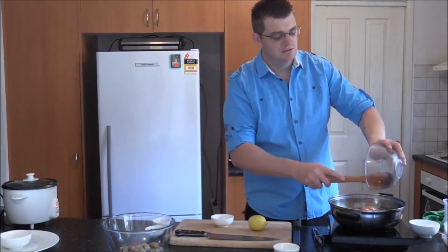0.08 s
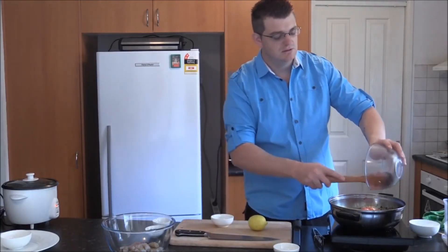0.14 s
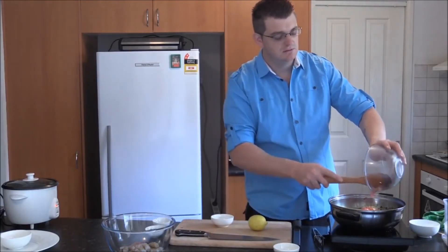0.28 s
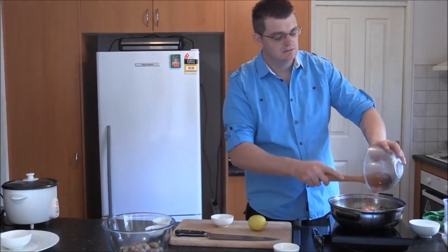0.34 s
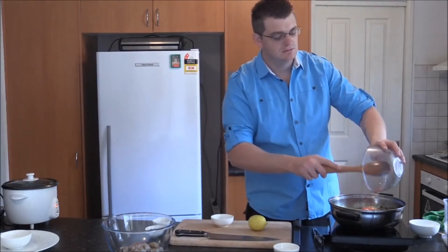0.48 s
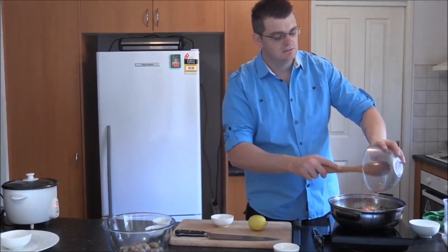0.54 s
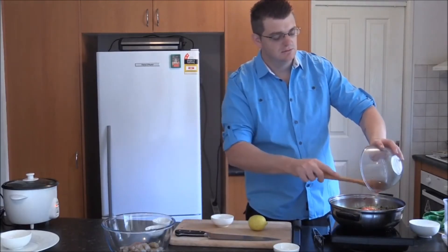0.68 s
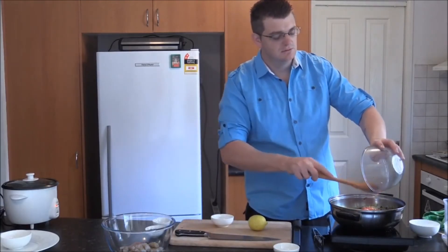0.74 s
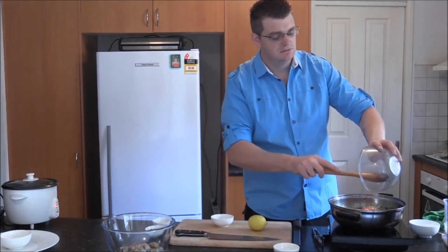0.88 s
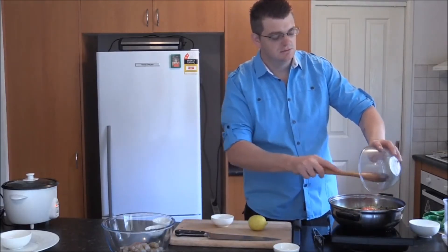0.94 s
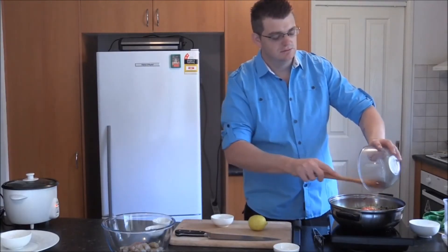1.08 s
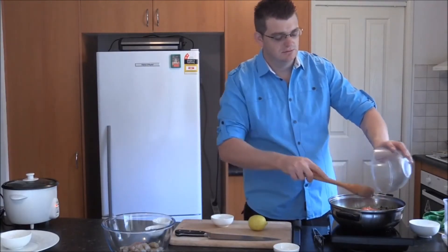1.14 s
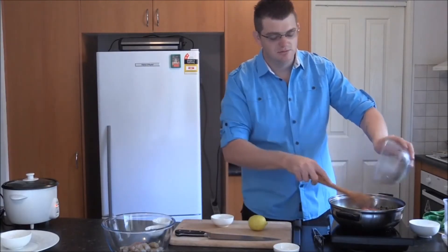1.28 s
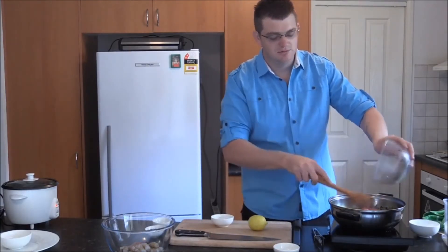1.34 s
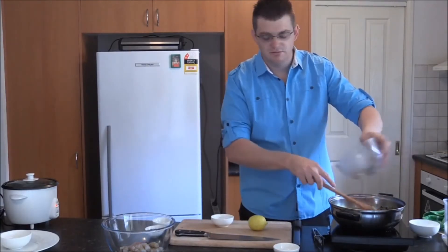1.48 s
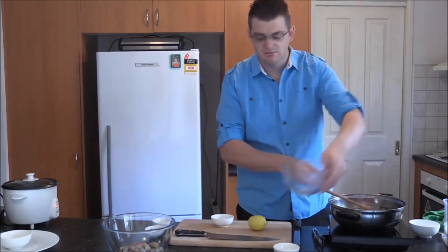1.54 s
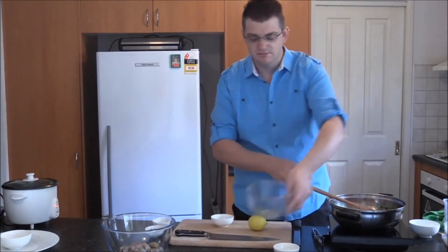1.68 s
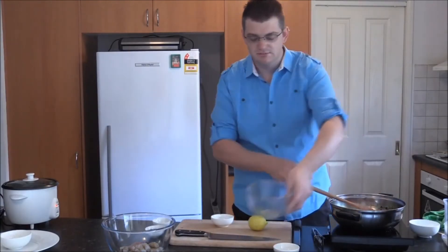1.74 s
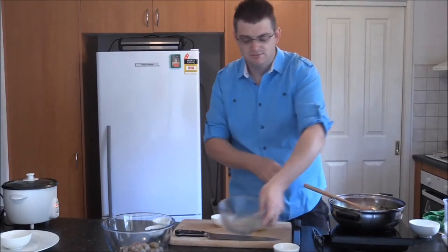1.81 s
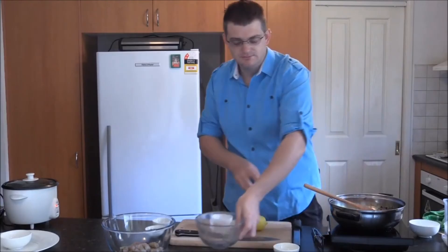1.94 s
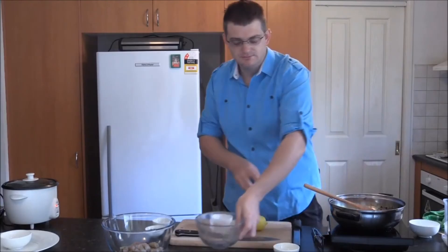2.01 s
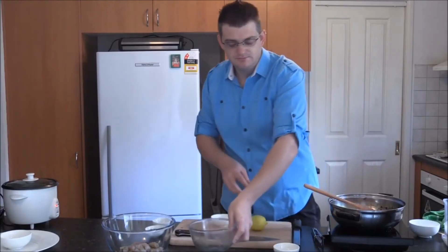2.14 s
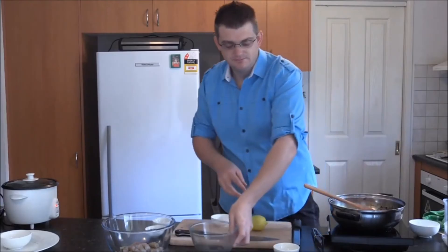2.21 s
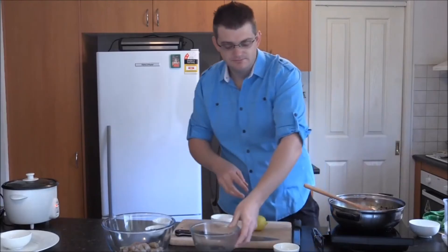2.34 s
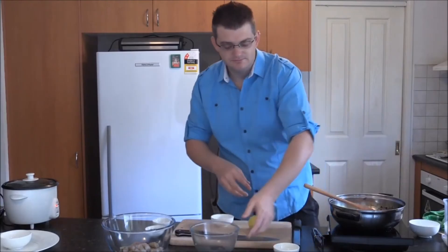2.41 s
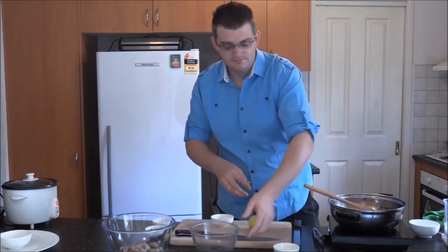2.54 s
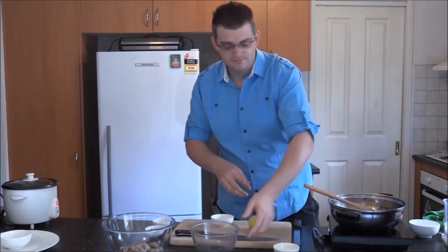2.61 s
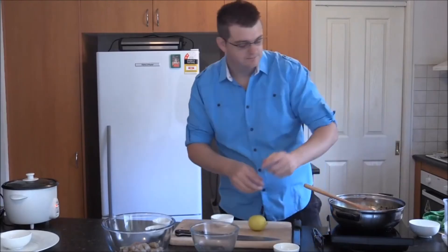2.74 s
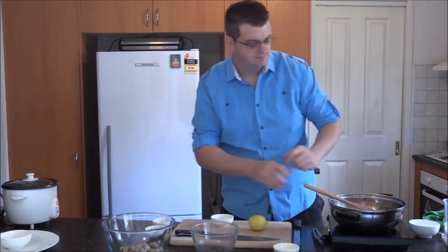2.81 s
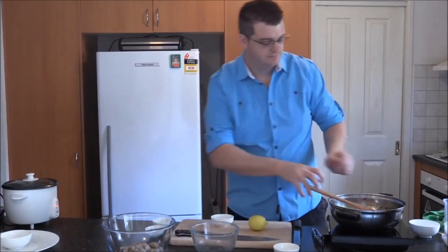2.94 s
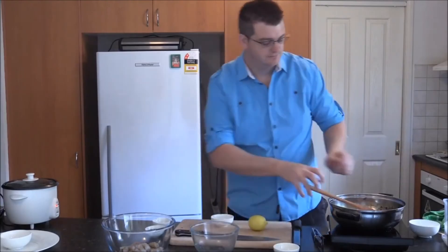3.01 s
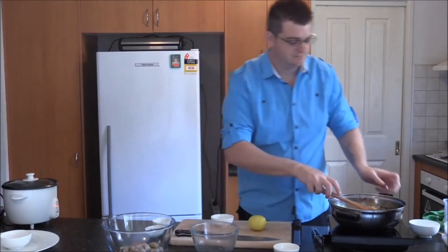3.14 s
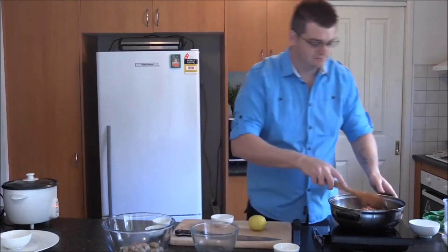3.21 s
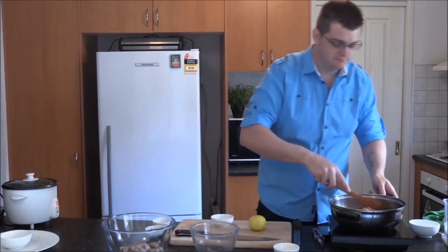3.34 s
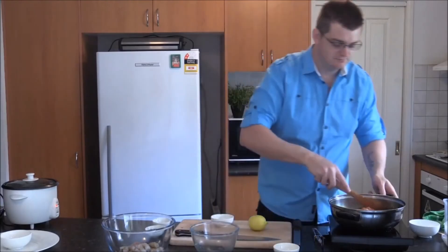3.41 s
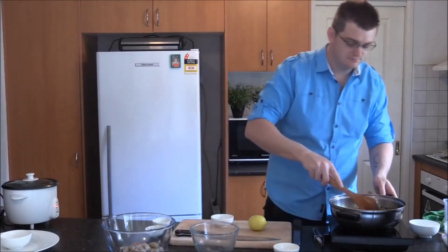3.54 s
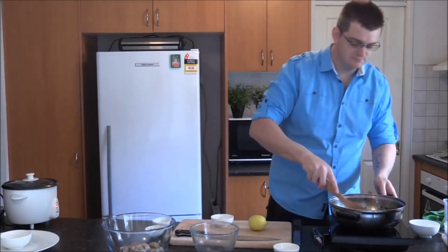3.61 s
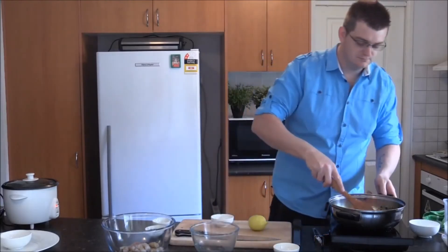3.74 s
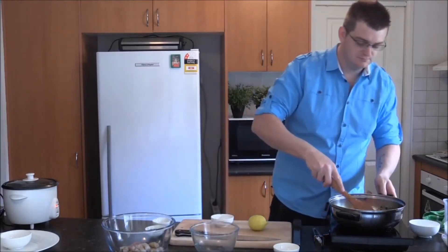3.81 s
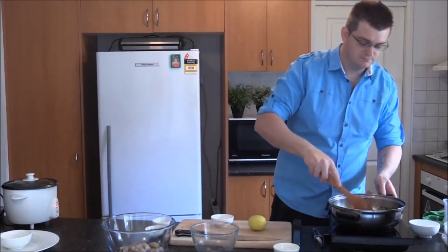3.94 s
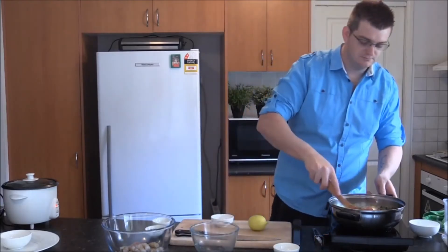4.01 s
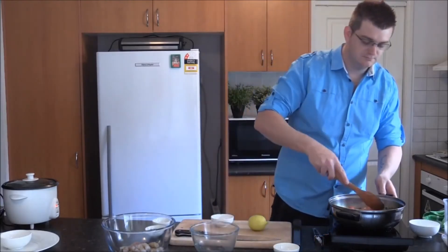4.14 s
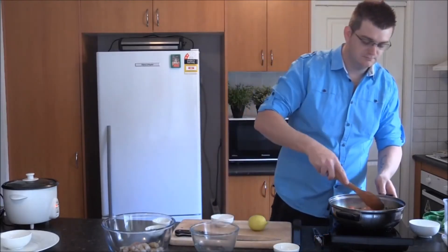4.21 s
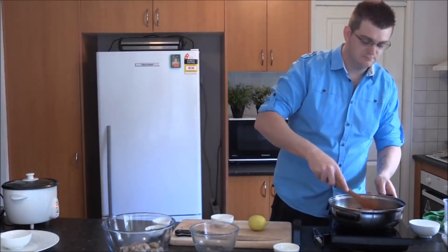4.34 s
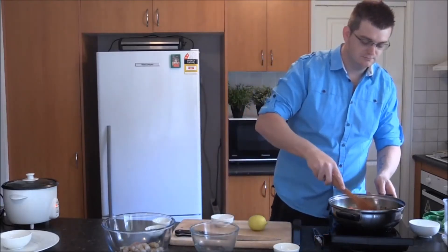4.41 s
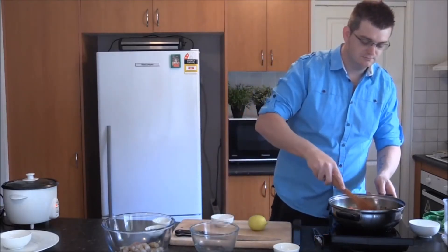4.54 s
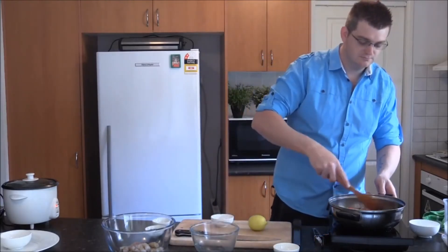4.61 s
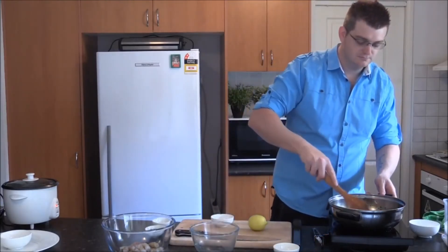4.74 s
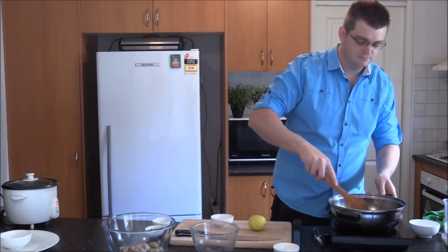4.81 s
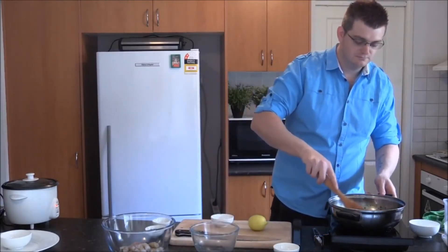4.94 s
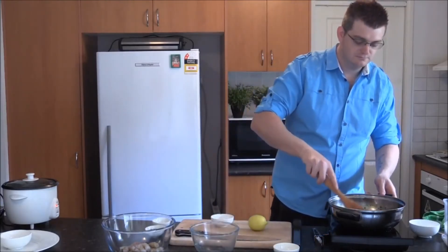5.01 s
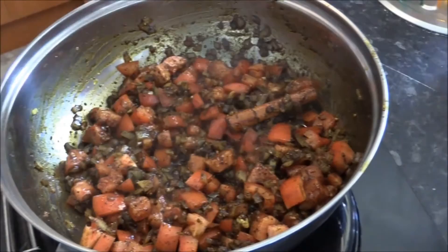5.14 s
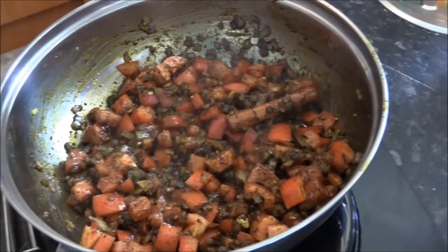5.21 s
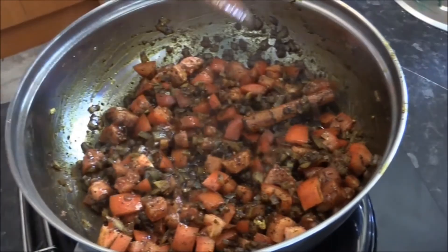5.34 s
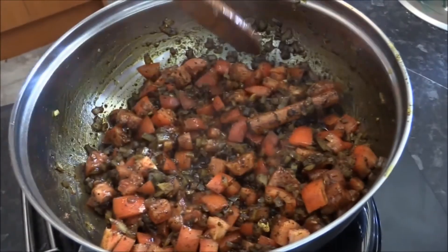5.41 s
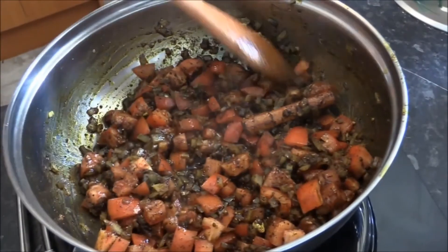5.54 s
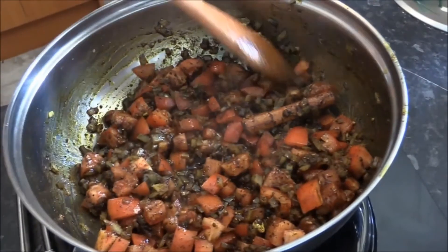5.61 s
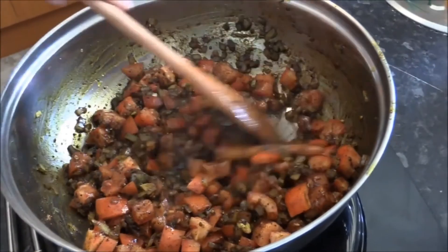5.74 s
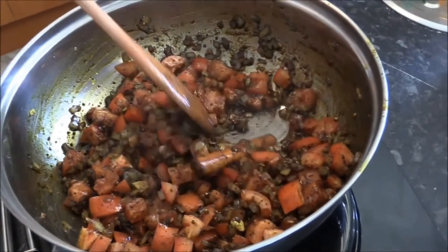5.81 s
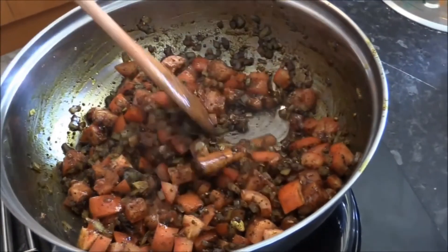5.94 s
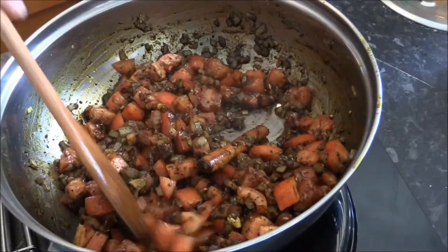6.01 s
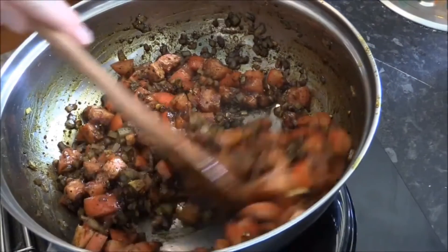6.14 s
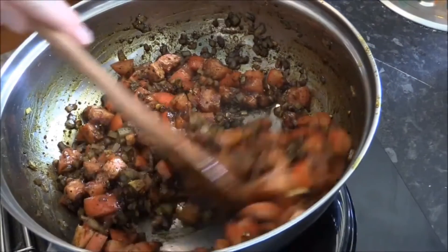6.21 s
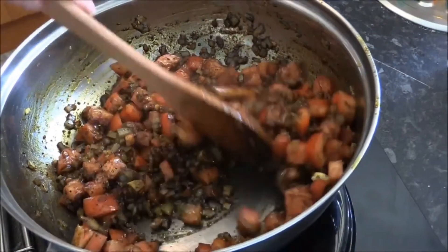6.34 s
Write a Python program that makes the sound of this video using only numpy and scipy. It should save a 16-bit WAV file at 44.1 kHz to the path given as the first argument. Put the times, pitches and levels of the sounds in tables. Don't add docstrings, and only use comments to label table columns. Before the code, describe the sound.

Distant frying and a breathy fan hum fill a lightly reverberant kitchen. Sharp, short knocks of wood on a plastic bowl come first, loud enough to duck the background. A dull set-down and a fast wobbling rattle on the counter follow, then steam hiss rising as the pan is stirred. The view cuts close, with dense crackling, fuller fan drone, soft low thuds on the loaded pan and a strong knock at the end.

```python
import sys
import numpy as np
from scipy import signal
from scipy.io import wavfile
from scipy.ndimage import uniform_filter1d, minimum_filter1d

SR = 44100
rng = np.random.default_rng(int(sys.argv[2]) if len(sys.argv) > 2 else 0)


def magnitude_from_level(level_db):
    exponent = np.asarray(level_db, float) / 20
    return 10 ** exponent


def master_out(mix):
    frames = np.transpose(np.atleast_2d(mix))
    ceiling = np.clip(frames, -1, 1)
    pcm = np.round(ceiling * 32767).astype(np.int16)
    wavfile.write(sys.argv[1], SR, pcm)


N = 280917
SCENE_CHANGE_S = 5.316
SPLIT = np.array([[.5], [-.5]])


def evened(x):
    return x / np.sqrt(np.mean(x ** 2) + 1e-20)


def read(points, hz):
    f, value = np.transpose(points)
    return np.interp(np.log(hz + 1), np.log(f + 1), value)


def resonate(x, hz, width):
    b, a = signal.iirpeak(hz, hz / width, SR)
    return signal.lfilter(b, a, x)


def resonate_twice(x, hz, width):
    return resonate(resonate(x, hz, width), hz, width)


def soften(x, hz, order=2):
    return signal.sosfilt(signal.butter(order, np.clip(hz, 50, 18000), fs=SR, output="sos"), x)


def thin(x, hz):
    return signal.sosfilt(signal.butter(4, hz, "high", fs=SR, output="sos"), x)


def by_view(far, close):
    return np.where(np.arange(N) < SCENE_CHANGE_S * SR, far, close)


def hump(s, half_s):
    return np.cos(np.pi / 2 * np.clip((np.arange(N) / SR - s) / half_s, -1, 1)) ** 2


def stirred():
    # start t/s, length t/s, share of the pan
    strokes = [
        (3.58, 0.19, 0.49),
        (4.34, 0.56, 0.43),
    ]
    t = np.arange(N) / SR
    return sum(share * np.clip((t - s) / length, 0, 1) for s, length, share in strokes)


def air(colour, patchy_db, pops=0):
    # f/Hz, left-right likeness
    coherence = [(60, 0.19), (180, 1), (550, 0.8), (1650, 0.46), (4970, 0.66), (15000, 0.51)]
    # f/Hz, left over right level/dB
    balance = [(60, -14), (180, 4), (550, 4), (1650, 2.5), (4970, 1), (15000, 1.5)]
    hz, _, z = signal.stft(rng.standard_normal((2, N)) + pops, SR, nperseg=512, noverlap=384)
    same = np.clip(read(coherence, hz), 0, 1)[:, None]
    z[1] = same * z[0] + np.sqrt(1 - same ** 2) * z[1]
    patches = uniform_filter1d(rng.standard_normal(z[0].shape), size=9, axis=0)
    patches = evened(uniform_filter1d(patches, size=9, axis=1))
    lean_db = read(balance, hz)[:, None] * SPLIT[:, :, None]
    z = z * magnitude_from_level(read(colour, hz)[:, None] + lean_db + patchy_db * patches)
    return evened(signal.istft(z, SR, nperseg=512, noverlap=384)[1][:, :N])


def ring(modes, pitch, hard_db, crack_db, crack_hz, count=120):
    t = np.arange(SR // 3) / SR
    sides = rng.choice([-1, 1], len(modes))
    tone = 0
    for side, (hz, db, t60) in zip(sides, modes):
        level = magnitude_from_level(db + hard_db * np.log2(hz / 1700) - 60 * t / t60)
        tone = tone + side * level * np.sin(2 * np.pi * hz * pitch * t)
    contact = np.zeros(len(t))
    contact[[10, count]] = .4, 1
    crack = soften(contact, crack_hz, order=3)
    both = tone * np.minimum(1, t / 0.00087) + magnitude_from_level(crack_db) * crack / abs(crack).max()
    return both / np.sqrt(np.mean(both[:200] ** 2)) * 0.22


def add(mix, s, sound):
    part = mix[..., round(s * SR):][..., :sound.shape[-1]]
    part += sound[..., :part.shape[-1]]


def kitchen(x, wet_db):
    # f/Hz, t60 t/s
    room_decay = [(250, 0.35), (700, 0.35), (1700, 0.38), (4600, 0.33), (10000, 0.26)]
    taps = np.zeros((2, SR // 2))
    slots = np.arange(120, SR // 2 - 20, 20)
    at = slots + rng.integers(0, 20, (2, len(slots)))
    np.put_along_axis(taps, at, rng.choice([-1., 1.], at.shape), 1)
    taps[1] = 0.72 * taps[0] + 0.9 * taps[1]
    hz, t, z = signal.stft(taps, SR, nperseg=256)
    tail = signal.istft(z * magnitude_from_level(-60 * t / read(room_decay, hz)[:, None]), SR, nperseg=256)[1]
    tail = tail / np.linalg.norm(tail[0])
    return x + magnitude_from_level(wet_db) * signal.fftconvolve(x, tail, axes=1)[:, :x.shape[1]]


def fan():
    # f/Hz, level/dB per Hz
    rush = [(40, -58), (120, -46), (200, -13.5), (300, 0), (420, -6), (600, -5.5), (1000, -5.5), (1500, -8),
            (3000, -15), (6000, -20), (12000, -42)]
    # f/Hz, width f/Hz, level/dB
    housing = [(348.5, 41.5, -9), (476, 10.6, -12), (683, 34, -16.5), (1074.4, 22, -11.5),
               (1838, 37, -17.5), (2140, 28, -50)]
    flow = rng.standard_normal(N)
    whines = sum(magnitude_from_level(db) * evened(resonate_twice(flow, hz, width)) for hz, width, db in housing)
    waver = evened(soften(rng.standard_normal(N), 3.0))
    blade_hz, blade_db = 1088 + 1.4 * waver, -9 + 2.1 * waver
    blade = magnitude_from_level(blade_db) * np.sin(2 * np.pi * np.cumsum(blade_hz) / SR)
    tones = (whines + blade) * magnitude_from_level(3.2 * SPLIT)
    level_db = by_view(-46, -27.5) + by_view(0.3, 1.2) * SPLIT
    return magnitude_from_level(level_db) * (thin(air(rush, patchy_db=1.14), 175) + tones)


def frying():
    # f/Hz, level/dB per Hz
    bubbling = [(500, -52), (1000, -3.5), (2000, 1.5), (3300, -2), (5000, -10), (8000, -22), (15000, -67)]
    # f/Hz, level/dB per Hz
    steam = [(1500, -48), (3000, 1.5), (5000, 0.5), (8000, -2.5), (11000, -9.5), (14000, -14), (16000, 2.5)]
    # t/s, vigour level/dB
    vigour = [(0.0, -0.5), (0.3, 2.5), (0.6, 5), (1.0, 4.5), (1.77, 2.5), (2.2, 4.5), (2.5, 3), (2.8, 2.5),
              (3.57, 2), (4.55, -1), (4.82, 4), (5.27, 2.5), (5.35, 4.5), (5.68, -2), (5.86, -0.5),
              (6.04, 3.5), (6.14, -3.5), (6.37, -4.5)]
    # t/s, half length t/s, steam level/dB, bubbling level/dB
    freed = (3.87, .17, 3, -4)
    puff_s, puff_half_s, puff_steam_db, puff_bubble_db = freed
    size = magnitude_from_level(2.23 * np.minimum(rng.exponential(1, (2, N)), 5))
    burst = rng.random((2, N)) < 1500 / SR
    pops = size * burst * rng.choice([-1, 1], (2, N))
    vigour_db = np.interp(np.arange(N) / SR, *np.transpose(vigour))
    puff = hump(puff_s, puff_half_s)
    bubble_db = by_view(-44.5, -34.5) + vigour_db + puff_bubble_db * puff
    steam_db = by_view(-48 + 14 * stirred(), -34.5) + 0.58 * vigour_db + puff_steam_db * puff
    fizz = magnitude_from_level(bubble_db) * air(bubbling, patchy_db=1.44, pops=2.0 * pops[0])
    return fizz + magnitude_from_level(steam_db) * air(steam, patchy_db=1.73, pops=1.3 * pops[1])


def rumble():
    # t/s, half length t/s, level/dB
    shake = (2.63, 0.22, 17)
    shake_s, shake_half_s, shake_db = shake
    flow = rng.standard_normal((2, N))
    flow[1] = 0.73 * flow[0] + 0.9 * flow[1]
    lows = magnitude_from_level(-7.0) * evened(resonate_twice(flow, 74, 44)) + evened(resonate_twice(flow, 153, 45))
    far_db = -70 + 2 * stirred() + shake_db * hump(shake_s, shake_half_s)
    return magnitude_from_level(by_view(far_db, -49) + np.array([[2.2], [-1.8]])) * evened(lows)


def knocks():
    # t/s, level/dB, hardness level/dB, share of belly modes level/dB, share of rim modes level/dB
    blows = [
        (0.308, -1.5, 0.5, 7, 5.5),
        (0.464, -4, -0.2, 7, 5),
        (0.6462, -3, -2.8, -1, 3.5),
        (0.8805, -5.5, -4, -24, 7.5),
        (1.2185, -17, -5.5, 1.5, 5),
    ]
    # f/Hz, level/dB, t60 t/s
    bowl = [(1646, 0.5, 0.027), (1764, -3, 0.04), (1908, 0, 0.018), (3073, -1, 0.038), (4140, -9, 0.018),
            (9760, -10, 0.015), (10900, -21, 0.0095)]
    # f/Hz, level/dB, t60 t/s
    belly = [(690, -17, 0.054), (1337, -8.5, 0.026), (1556, 0.5, 0.019)]
    # f/Hz, level/dB, t60 t/s
    rim = [(800, -23.5, 0.043), (2186, -12.5, 0.031), (2300, -9.5, 0.023), (2515, -9.5, 0.026)]
    out = np.zeros((2, N))
    for s, db, hard_db, belly_db, rim_db in blows:
        modes = np.concatenate([bowl, np.add(belly, (0, belly_db, 0)), np.add(rim, (0, rim_db, 0))])
        crack_hz = 5500 * magnitude_from_level(0.67 * hard_db)
        blow = thin(ring(modes, 1, hard_db, crack_db=13.5 + 2.0 * hard_db, crack_hz=crack_hz), 490)
        blow = blow * magnitude_from_level(db + 3.2 * SPLIT)
        add(out, s, kitchen(np.pad(blow, ((0, 0), (0, SR // 4))), wet_db=5.5))
    return out


def clinks():
    # t/s, level/dB, f/Hz, width f/Hz, t60 t/s
    noises = [(1.36, -39.5, 1800, 298, 0.11), (1.36, -42.5, 620, 150, 0.13), (1.935, -34.5, 220, 45, 0.23),
              (1.921, -39, 1500, 1200, 0.21), (2.134, -41.5, 3900, 740.7, 0.14),
              (2.35, -38.5, 2960, 1620, 0.11), (2.462, -54, 10400, 3000, 0.17),
              (2.82, -47.5, 2060, 300, 2.5), (2.955, -38, 2640, 185.2, 0.063),
              (3.71, -53.5, 7660, 1800, 2.1), (3.971, -47, 135, 43, 0.17), (4.311, -44.5, 223, 54, 0.13),
              (5.51, -36.5, 9000, 4000, .03), (5.694, -30, 7800, 2000, .02),
              (5.779, -26.5, 131, 43.2, 0.19)]
    # t/s, level/dB, f/Hz, width f/Hz, t60 t/s
    glass_ping = (2.488, -52, 7750, 20, .6)
    out = np.zeros((2, N))
    t = np.arange(SR // 2) / SR
    for s, db, hz, width, t60 in noises + [glass_ping]:
        noise = evened(resonate_twice(rng.standard_normal(len(t)), hz, width))
        onset = np.minimum(1, t * hz / 3)
        add(out, s, magnitude_from_level(db - 60 * t / t60) * noise * onset)
    return kitchen(out, wet_db=-8.0)


def set_down():
    # t/s, jolt level/dB
    jolts = [(1.92, -29), (1.93, -27.5), (1.945, -29.5), (1.97, -39), (2.4866, -5), (2.496, -9),
             (2.509, -13), (2.522, -6.5), (2.538, -7), (2.551, -9.5), (2.562, -11), (2.574, -16),
             (2.585, -12.5), (2.598, -18), (2.61, -9), (2.64, -9.5), (2.652, -8.5), (2.662, -9),
             (2.677, -18), (2.70, -24), (2.735, -19)]
    # t/s, contact sharpness f/Hz, dulling in octaves per s
    landings = [
        (1.92, 704, 22),
        (2.4865, 1310, 7.5),
        (2.61, 1180, 0.1),
        (2.64, 1480, 11),
    ]
    # f/Hz, level/dB, t60 t/s
    counter = [(150, -15.5, 0.061), (234, -10.5, 0.034), (356, -3.5, 0.031), (509, -0.5, 0.029),
               (646, -2, 0.038), (780, 2.5, 0.035), (940, 0.5, 0.021), (1290, -6, 0.024),
               (1620, -11.5, 0.024), (2200, -15, 0.0095)]
    out = np.zeros(N)
    for s, db in jolts:
        landed_s, landed_hz, dulling = [row for row in landings if row[0] < s + .005][-1]
        sharp_hz = landed_hz * 2 ** (-dulling * (s - landed_s))
        blow = ring(counter, rng.uniform(0.943, 1.05), hard_db=0.5, crack_db=7.0, crack_hz=2520)
        jolt = soften(blow, sharp_hz)
        add(out, s, magnitude_from_level(db) * jolt / abs(jolt).max())
    return kitchen(thin(thin(out, 150), 138) * magnitude_from_level(3.8 * SPLIT), wet_db=0.5)


def stirring():
    # t/s, level/dB, left over right level/dB
    thuds = [
        (5.43, -13, 6),
        (5.56, -13.5, 4),
        (5.664, -12, 2),
        (5.856, -14, 3),
        (6.326, 10, 6),
    ]
    # f/Hz, level/dB, t60 t/s
    pan_modes = [(150, -8, 0.05), (347, 3.5, 0.09), (473, -7, .04), (670, 1, 0.047), (970, -16, 0.022),
                 (1200, -4, 0.021), (1430, 4.5, 0.015), (1800, 0.5, 0.023), (2840, -4.5, 0.013)]
    out = np.zeros((2, N))
    for s, db, lean_db in thuds:
        pitch = 0.995 + 0.051 * rng.random()
        blow = ring(pan_modes, pitch, hard_db=-0.6, crack_db=1.0, crack_hz=2300, count=55)
        add(out, s, blow * magnitude_from_level(db + 0.5 + lean_db * SPLIT))
    return kitchen(out, wet_db=-9.5)


def scene():
    t = np.arange(N) / SR
    hits = knocks() + set_down() + clinks() + thin(stirring(), 150)
    mix = fan() + frying() + rumble() + hits
    power = abs(uniform_filter1d((mix ** 2).mean(0), size=2001, origin=1000))
    level_db = 10 * np.log10(power + 1e-12)
    back_db = t * 2.5
    ride_db = np.maximum.accumulate(np.clip(level_db + 31.5, 0, 4.5) + back_db) - back_db
    ride_db = uniform_filter1d(ride_db, size=6001, origin=3000)
    cut_s, open_s = 5.279, 5.3395
    tail_db = np.where(t < cut_s, 0, -9 - 953.5 * (t - cut_s)) - ride_db
    settle_db = 3.0 * np.exp(-abs(t - open_s) / 0.19)
    opened = np.clip((t - open_s) / 0.0047, 0, 1) ** 2 * magnitude_from_level(settle_db)
    leak = magnitude_from_level(-48 - 101 * abs(open_s - t))
    return mix * by_view(magnitude_from_level(11 + tail_db), magnitude_from_level(4) * (opened + leak))


def roll_off(x):
    return signal.sosfilt(signal.butter(12, 15500, fs=SR, output="sos"), x)


def record(dry):
    dry = soften(soften(dry, 13500, order=4), 15300, order=16)
    peak = -minimum_filter1d(-abs(dry).max(0), size=1001, origin=-470)
    fall_db = np.arange(N) * 88.0 / SR
    over_db = np.maximum(20 * np.log10(peak + 1e-9) + 0.54, 0)
    held_db = np.maximum(np.maximum.accumulate(over_db + fall_db) - fall_db, 0)
    limited = np.clip(dry / magnitude_from_level(0.7 * uniform_filter1d(held_db, size=100)), -1, 1)
    return roll_off(soften(limited, 15000, order=12))


dry = scene()
out = record(dry)
master_out(out)
```